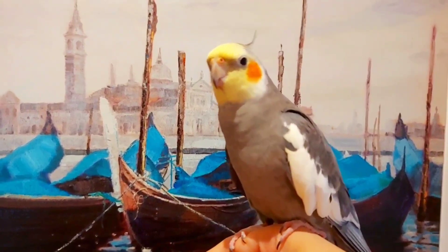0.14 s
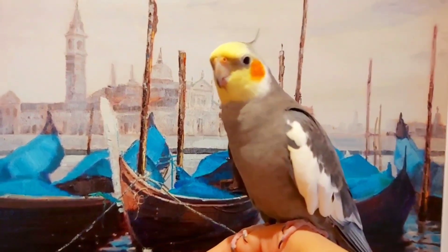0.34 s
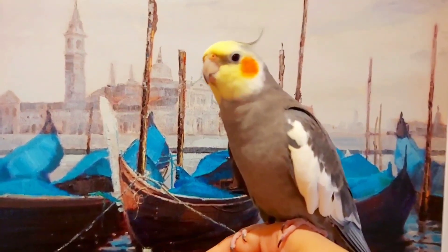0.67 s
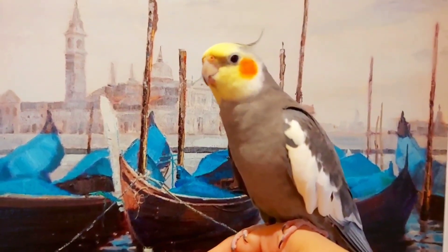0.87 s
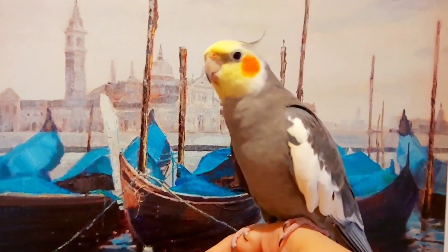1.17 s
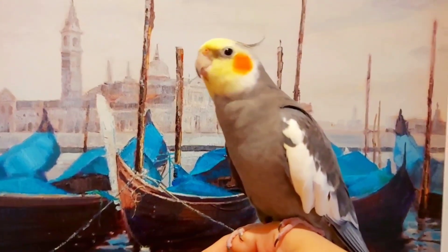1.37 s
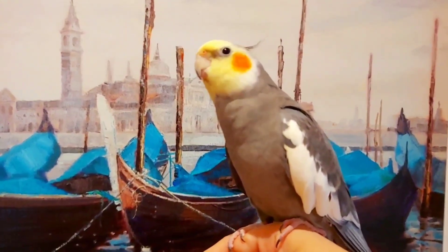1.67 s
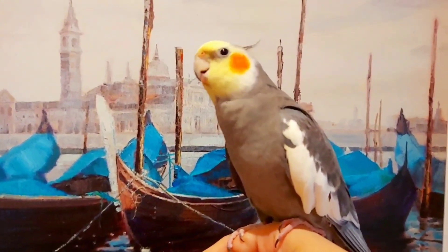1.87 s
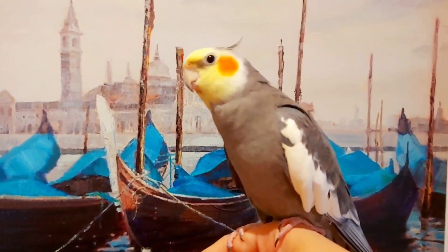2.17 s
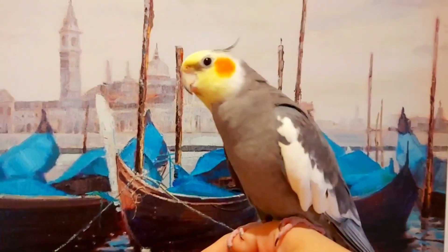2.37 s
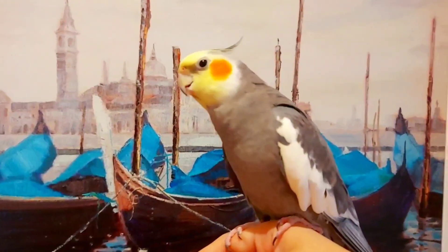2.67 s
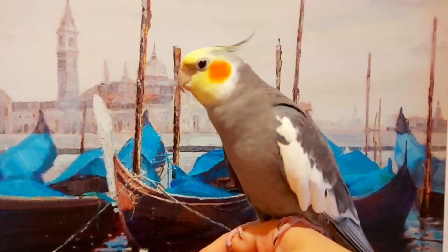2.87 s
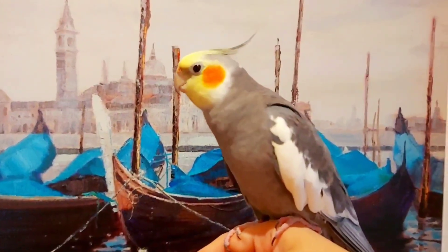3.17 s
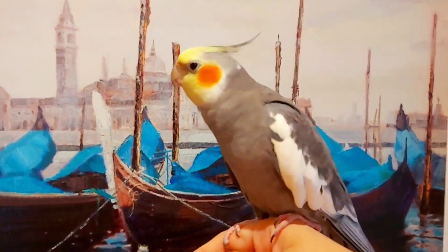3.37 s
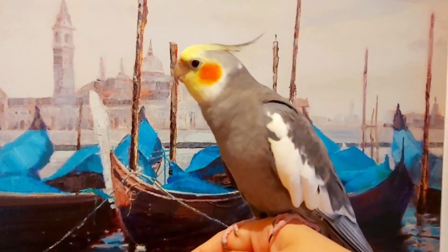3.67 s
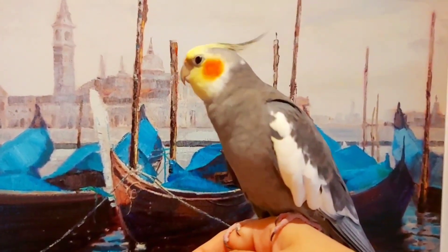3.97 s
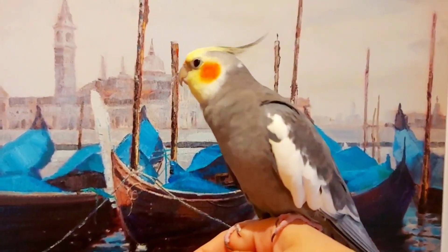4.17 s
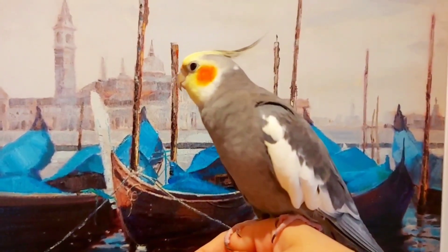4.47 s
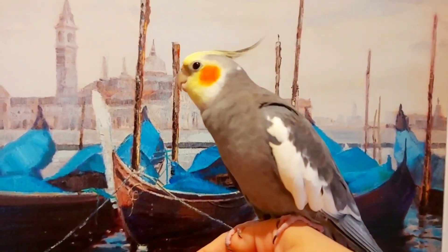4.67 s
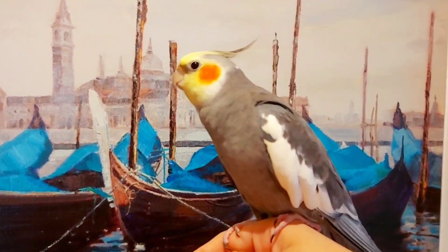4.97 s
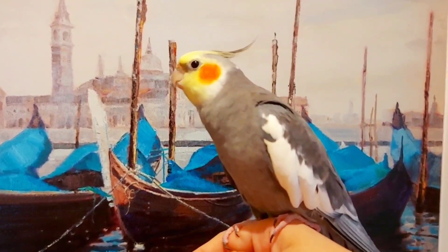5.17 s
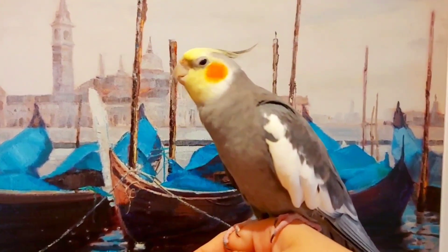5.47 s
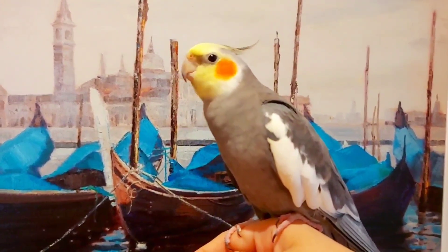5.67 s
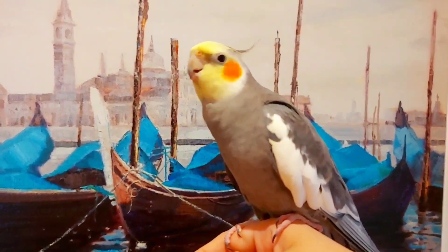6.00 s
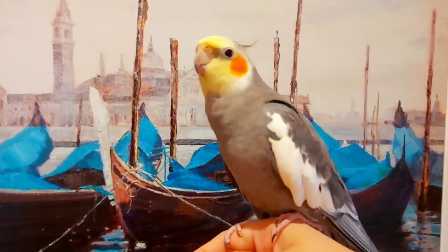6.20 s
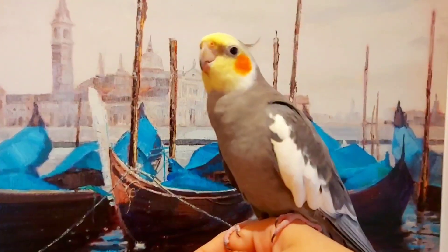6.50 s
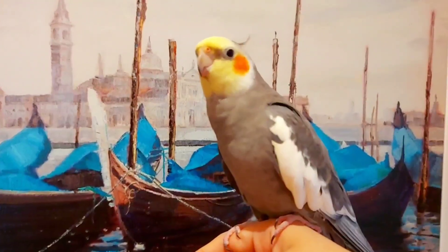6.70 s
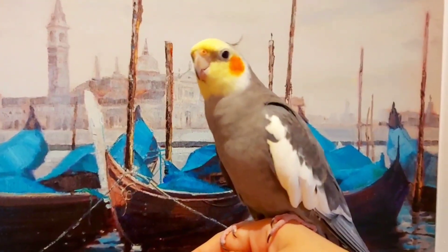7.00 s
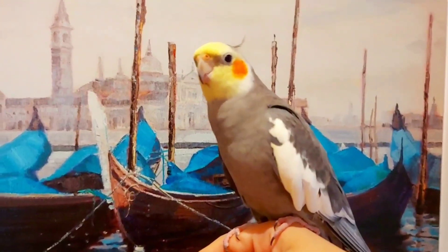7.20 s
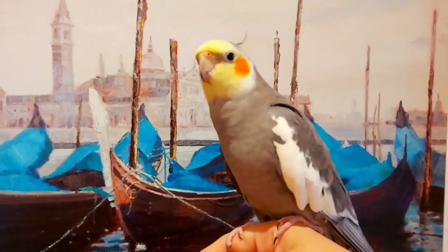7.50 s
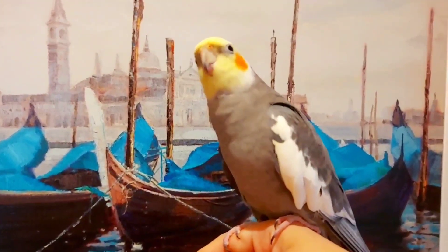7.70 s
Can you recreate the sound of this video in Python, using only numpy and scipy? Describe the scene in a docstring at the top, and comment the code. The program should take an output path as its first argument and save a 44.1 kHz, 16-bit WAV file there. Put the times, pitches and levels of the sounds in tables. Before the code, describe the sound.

A bare, lively room is still faintly ringing from an earlier whistle, over quiet uneven rumble and thin hiss. At about 0.5 s a close cockatiel, towards the left, whistles a note swooping up to a wavering hold; at 0.9 s comes a higher one, broken by raspy cracks and falling, and at 1.3 s one climbing in steps from a soft low start. From 1.7 s it switches to fourteen similar chirps, about every 0.4 s, up to 6.85 s, then after a longer pause a last one at 7.5-7.7 s. Each lasts about 0.2 s: a soft low whistle dips, bends up, leaps to a piercing upper voice, climbs and stops abruptly with a tiny crack. Peaks slightly overload the left side, and short bright reverberation fills the gaps. Rumble grows after 6 s; rumble and hiss swell around the final chirp until 7.85 s.

```python
"""A bare, lively room: a cockatiel perched on a hand whistles three warbled notes, then a row of rising chirps.
The voice is a near sine with overtones, roughened by cracks and glides, close to the left of two microphone ports;
its loudest notes overload the left side. A noise tail dying band by band is the room, still ringing with an
earlier note at the start. Shaped noise makes the low rumble, rising and falling unevenly and loudest at the end,
and the faint hiss."""
import sys
import numpy as np
from scipy import signal
from scipy.fft import rfft, irfft, next_fast_len
from scipy.io import wavfile
from scipy.ndimage import uniform_filter1d

SR = 44100
rng = np.random.default_rng(int(sys.argv[2]) if len(sys.argv) > 2 else 0)


def wrap_up_sound(samples):
    """Save the sound to the file named by the first command line argument, as 16-bit audio."""
    columns = np.atleast_2d(samples).T
    # keep every value between -1 and 1, then stretch to whole-number steps
    tamed = np.clip(columns, -1, 1)
    steps = np.round(tamed * 32767).astype(np.int16)
    wavfile.write(sys.argv[1], SR, steps)


N = 346185

# lift by windpipe, beak and microphone: f/Hz, gain/dB
TRACT_GAIN = [(2000, 45.5), (2800, 15.5), (3600, 7), (4500, 9), (6500, -6), (9000, -11), (11500, 11.5),
              (13000, 14.5), (15500, 4.5)]
# room bands: f/Hz, t60/s, tail level/dB
ROOM_BANDS = [(795, 0.35, -8.5), (1670, 0.56, -11.5), (2800, 0.53, -12.5), (5070, 0.44, -14),
              (12000, 0.34, -7.5)]


def from_db(db):
    """Decibels to gain."""
    return 10 ** (np.asarray(db) / 20)


def rms_one(x):
    """Scale to rms 1."""
    return x / np.sqrt(np.mean(x ** 2) + 1e-20)


def at_hz(points, hz, axis=1):
    """Read a table column on a log-frequency axis."""
    table = np.array(points)
    return np.interp(np.log(np.maximum(hz, 1)), np.log(table[:, 0]), table[:, axis])


def drift(rate_hz):
    """Slow chance: noise twice through a one-pole low-pass, rms 1."""
    r = np.exp(-2 * np.pi * rate_hz / SR)
    noise = rng.standard_normal(N + SR)
    return rms_one(signal.lfilter([1], [1, -2 * r, r * r], noise)[SR:])  # settled part


def coloured_noise(spectrum):
    """Stereo noise of a given spectrum, its sides correlated in the bass, rms 1."""
    # left-right correlation: f/Hz, correlation/1
    likeness = [(60, 1), (300, 0.7), (700, 0.75), (1500, 0.037), (15000, 0)]
    hz = np.arange(N // 2 + 1) * SR / N
    mid, side = rfft(rng.standard_normal((2, N))) * from_db(at_hz(spectrum, hz))
    alike = np.clip(at_hz(likeness, hz), -1, 1)
    stereo = np.sqrt(1 + alike) * mid + np.sqrt(1 - alike) * side * [[1], [-1]]
    return rms_one(irfft(stereo, N))


def earlier_ring():
    """Room ring of a note that has just ended: narrow noise bands dying at the room's t60."""
    # f/Hz, width/Hz, starting level/dB
    ring_bands = [(1518, 78, -55.5), (2060, 170, -73.5), (3020, 250, -65)]
    t = np.arange(N) / SR
    out = 0
    for hz, width_hz, db in ring_bands:
        r = np.exp(-np.pi * width_hz / SR)
        resonator = [1, -2 * r * np.cos(2 * np.pi * hz / SR), r * r]
        ring = signal.lfilter([1, 0, -1], resonator, rng.standard_normal((2, N)))
        out = out + from_db(db - 60 * t / at_hz(ROOM_BANDS, hz)) * rms_one(ring)
    return out


def rumble():
    """One coloured noise split near 140 Hz; hum and upper rumble rise and fall apart."""
    # levels ahead of the port gain: t/s, low hum/dB, upper rumble/dB
    levels = [(0.0, -75, -63.5), (1.2, -66.5, -69.5), (2.3, -74, -67.5), (2.9, -76.5, -73), (3.4, -81, -66),
              (4.6, -71.5, -68.5), (5.1, -63.5, -68.5), (5.6, -67.5, -69), (6.2, -68, -58),
              (7.37, -65.5, -59.5), (7.85, -61, -48)]
    # relative spectrum: f/Hz, density/dB per Hz
    colour = [(12, -48.5), (20, -22.5), (75, 7), (173, -12), (248, -8), (549, -25.5), (677, -28),
              (835, -26.5), (1010, -32.5), (2820, -39), (3000, -51.5), (3900, -85.5), (6600, -120)]
    t_s, hum_db, upper_db = np.transpose(levels)
    t = np.arange(N) / SR
    noise = coloured_noise(colour)
    hum = signal.sosfiltfilt(signal.butter(2, 140, fs=SR, output="sos"), noise)
    hum_gain = from_db(np.interp(t, t_s, hum_db) + .8 * drift(6))
    upper_gain = from_db(np.interp(t, t_s, upper_db) + 1.3 * drift(6))
    return hum_gain * rms_one(hum) + upper_gain * rms_one(noise - hum)


def faint_hiss():
    """Coloured noise of slowly wavering level, setting in louder near the end."""
    # level ahead of the port gain: t/s, level/dB
    levels = [(0, -72), (7.44, -75), (7.5, -57), (7.85, -51)]
    # relative spectrum: f/Hz, density/dB per Hz
    colour = [(300, -15), (600, 0), (1500, 2), (3000, -7.5), (5000, -7.5), (8000, -7), (12000, -3),
              (15500, -9)]
    level_db = np.interp(np.arange(N) / SR, *np.transpose(levels)) + 1.5 * drift(12)
    return from_db(level_db) * coloured_noise(colour)


def overtones(phase, pitch, level_db, bright_db, strain):
    """Harmonics lifted by tract and effort; the higher, the more flicker and noise in amplitude and phase."""
    # source: multiple/1, amplitude ahead of tract and effort/dB
    source = [(2, -29.5), (3, -28.5), (4, -37), (5, -37.5), (6, -46), (7, -54)]
    EFFORT_SHARE = .08  # overtone dB per dB of level
    FLICKER_DB = .75  # per multiple at strain 1
    out = 0
    for k, source_db in source:
        tract_db = at_hz(TRACT_GAIN, k * pitch)
        flicker_db = FLICKER_DB * strain * k * drift(52)
        lift = from_db(source_db + bright_db + tract_db + EFFORT_SHARE * level_db + flicker_db)
        grain = 1 + .17 * strain * k * drift(160)
        tone = np.sin(k * phase + .15 * strain * k * drift(150))
        out = out + lift * (k * pitch < SR / 2.3) * grain * tone
    return out


def membrane_shake(t, glide, cracks, cracking):
    """Cracks and fast glides shake the membranes: modulation that puts side tones round every line."""
    RASP_DB, GLIDE_RASP = -57.5, .00044  # steady rasp; extra gain per octave/s
    FLUTTER_HZ = 750
    low_pass = signal.butter(4, 1100, fs=SR, output="sos")
    noise = rms_one(signal.sosfilt(low_pass, rng.standard_normal(N)))
    flutter = np.sin(2 * np.pi * FLUTTER_HZ * t) + .9 * noise
    crack_gain = np.dot(from_db([row[2] for row in cracks]), cracking)
    return (from_db(RASP_DB) + GLIDE_RASP * glide) * noise + crack_gain * flutter


def breath_noise():
    """Air noise above 5.5 kHz through the tract, rms 1."""
    hz = np.arange(N // 2 + 1) * SR / N
    white = rfft(rng.standard_normal(N))
    return rms_one(irfft(white * from_db(at_hz(TRACT_GAIN, hz)) * (hz > 5500), N))


def bird():
    """Syrinx: a near sine along pitch and level contours, with overtones, membrane shake and breath."""
    # three warbled notes, a curve each: t/s, pitch/Hz, level/dB
    warbles = [
        [(0.469, 1190, -44.5), (0.474, 1193, -36.5), (0.498, 1133, -33.5), (0.534, 1317, -22),
         (0.545, 1640, -25), (0.554, 1923, -13.5), (0.584, 2010, -6.5), (0.618, 2115, -10.5),
         (0.662, 1998, -14), (0.698, 2116, -9), (0.742, 2032, -9), (0.751, 2030, -44)],
        [(0.927, 2094, -26), (0.932, 2055, -26), (0.946, 2292, -14), (0.957, 2475, -2.5), (0.972, 2500, 0.2),
         (0.99, 2360, -6), (1.018, 2390, -8.5), (1.032, 2313, -24), (1.056, 2353, -21.5), (1.068, 2204, -20.5),
         (1.084, 2210, -8.5), (1.114, 2050, -7), (1.13, 2065, -12.5), (1.14, 2067, -25.5)],
        [(1.279, 1260, -34), (1.304, 1189, -25.5), (1.364, 1227, -26), (1.396, 1464, -22), (1.404, 1844, -14.5),
         (1.436, 2204, -9.5), (1.462, 2262, -10.5), (1.488, 2280, -11.5), (1.506, 2460, -10),
         (1.516, 2475, -11.5), (1.525, 2510, -41)],
    ]
    # chirps: start/s, leap/s, crest/s, end/s, dip/Hz, bend/Hz, mid-climb/Hz, top/Hz, low/dB, landing/dB,
    # mid-climb/dB, top/dB, closing/dB, crack flutter gain/dB, overtone and breath offset/dB
    chirp_rows = [ (1.711, 1.798, 1.861, 1.899, 1218, 1294, 2230, 2846, -26.5, -10, -12.5, -0.9, -3, -41.5, -3.5),
                  (2.083, 2.171, 2.248, 2.274, 1175, 1244, 2335, 2800, -28.5, -10.5, -10.5, -3.5, -4.5, -34, -2.5),
                  (2.476, 2.565, 2.65, 2.68, 1190, 1268, 2185, 2740, -27, -12, -13.5, -5.5, -5.5, -32.5, -2),
                  (2.874, 2.974, 3.046, 3.08, 1179, 1275, 2120, 2745, -28, -16, -11, -4.5, -15.5, -17, -1.6),
                  (3.291, 3.393, 3.458, 3.516, 1207, 1256, 2200, 2778, -27, -16.5, -11, -7, -16, -35.5, -1.2),
                  (3.678, 3.795, 3.862, 3.886, 1192, 1308, 2243, 2793, -26.5, -15.5, -10.5, -5, -5, -40, -0.9),
                  (4.091, 4.195, 4.268, 4.336, 1128, 1267, 2300, 2800, -27.5, -14, -9, -4.5, -19.5, -32, -1.2),
                  (4.507, 4.618, 4.72, 4.736, 1179, 1245, 2252, 2801, -27.5, -14, -11, -3.5, -8.5, -55, -1.3),
                  (4.933, 5.04, 5.115, 5.153, 1153, 1257, 2201, 2803, -28, -15.5, -10, -4.5, -5.5, -41, 0.2),
                  (5.353, 5.462, 5.536, 5.571, 1156, 1230, 2212, 2788, -29, -17, -15, -5, -7.5, -43.5, 0.9),
                  (5.842, 5.937, 6.012, 6.045, 1155, 1303, 2343, 2910, -27, -13.5, -9.5, -1.4, -1.5, -42, -2.5),
                  (6.23, 6.324, 6.386, 6.407, 1200, 1274, 2190, 2790, -26.5, -9.5, -12.5, -1.2, -9.5, -21.5, -2),
                  (6.65, 6.751, 6.824, 6.848, 1169, 1245, 2333, 2838, -29.5, -16, -10.5, -1.5, -6, -17, -1.5),
                  (7.473, 7.56, 7.654, 7.690, 1163, 1197, 2342, 2850, -31.5, -16.5, -11.5, -0.1, -9.5, -39, -1),
                  ]
    # cracks in the warbles: t/s, length/s, flutter gain/dB, pitch sag/share
    warble_cracks = [(.628, .008, -26, .04), (.648, .010, -18, .07), (.664, .010, -19, .08),
                     (.747, .010, -22, .06), (.936, .014, -12, .02), (1.020, .014, -14, 0),
                     (1.038, .020, -5, 0), (1.057, .014, -8, .23), (1.128, .010, -24, 0)]
    CLOSING_CRACK_S = .022
    PITCH_WAVER, GLIDE_PITCH_WAVER = .003, .0013  # share; extra share per octave/s
    LEVEL_WAVER_DB, GLIDE_LEVEL_WAVER_DB = .6, .13  # held note; extra per octave/s
    BREATH_DB, HALF_TONE_DB = -47, -61.5
    t = np.arange(N) / SR
    notes = warbles + [chirp(*row[:13]) for row in chirp_rows]
    cracks = warble_cracks + [(row[3] - CLOSING_CRACK_S / 2, CLOSING_CRACK_S, row[13], 0) for row in chirp_rows]

    t_s, hz, db = np.concatenate([np.array(note) for note in notes]).T
    contour = np.interp(t, t_s, hz)
    within = [(t >= note[0][0]) & (t <= note[-1][0]) for note in notes]
    sounding = uniform_filter1d(uniform_filter1d(1. * sum(within), size=60), size=60)
    bright_db = np.dot([row[14] for row in chirp_rows], within[len(warbles):])
    cracking = np.array([np.exp(-2 * ((t - row[0]) / (row[1] / 2)) ** 2) for row in cracks])
    sag = np.dot([row[3] for row in cracks], cracking)

    glide = uniform_filter1d(np.abs(np.gradient(np.log2(contour))) * SR, size=200)  # octaves/s
    capped_glide = np.minimum(glide, 8)
    waver = PITCH_WAVER + GLIDE_PITCH_WAVER * capped_glide  # sweeps climb unevenly
    pitch = contour * (1 - sag + waver * drift(49) + .0015 * drift(200))
    level_waver_db = (LEVEL_WAVER_DB + GLIDE_LEVEL_WAVER_DB * capped_glide) * drift(70)
    level_db = uniform_filter1d(np.interp(t, t_s, db), size=60) + level_waver_db
    strain = .2 + .14 * np.minimum(uniform_filter1d(glide, size=900), 8)  # held notes are cleaner

    phase = 2 * np.pi * np.cumsum(pitch) / SR
    tone = np.sqrt(2) * np.sin(phase) + overtones(phase, pitch, level_db, bright_db, strain)
    shaken = tone * (1 + membrane_shake(t, glide, cracks, cracking))
    breath = from_db(BREATH_DB + bright_db) * breath_noise()
    voice = from_db(level_db) * (shaken + breath)
    # unsteady tone an octave down, independent of the note's level
    half_gain = from_db(HALF_TONE_DB + 5.7 * drift(30)) * (1 + .5 * drift(120))
    voice += half_gain * np.sin(phase / 2)
    return signal.sosfilt(signal.butter(4, 500, "high", fs=SR, output="sos"), sounding * voice)


def chirp(start, leap, crest, end, dip_hz, bend_hz, mid_hz, top_hz, low_db, landing_db, mid_db, top_db, closing_db):
    """Turning points (t/s, f/Hz, level/dB): soft low dip, bend up, leap to the upper voice, climb, release."""
    START_HZ, BEND_TOP_HZ, LEAP_HZ, LANDING_HZ = 1225.2, 1455, 1773, 1855
    landing, closing = leap + .007, end - .0076
    dip = start + .42 * (leap - start)
    closing_hz = top_hz * .99
    return [
        (start, START_HZ, low_db - 7),
        (start + .005, START_HZ, low_db),
        (dip, dip_hz, low_db),
        (leap - .022, bend_hz, low_db + 2.5),
        (leap - .0067, BEND_TOP_HZ, low_db + 8.5),
        (leap, LEAP_HZ, -22.5),
        (landing, LANDING_HZ, landing_db),
        ((landing + crest) / 2, mid_hz, mid_db),
        (crest, top_hz * .98, top_db + .5),
        ((crest + closing) / 2, top_hz, top_db),
        (closing, closing_hz, closing_db),
        (end, closing_hz, closing_db - 28),
    ]


def heard_in_room(voice):
    """Direct sound at both ports plus a noise tail dying band by band, its own on each side."""
    # right port re left for the near bird: f/Hz, gain/dB, lag/rad
    right_port = [(585, -6.5, 0.26), (1620, -5.5, 1.82), (2450, -11, 2.02), (4900, -11.5, 3.0),
                  (8450, -1.5, 1.7), (11800, -6.5, 4.77), (15000, -3.5, 1.7)]
    ROOM_RIGHT_DB, ROOM_ONSET_S = -3, .0024
    size = next_fast_len(N + SR)
    hz = np.arange(size // 2 + 1) * SR / size
    t = np.arange(SR) / SR
    right = from_db(at_hz(right_port, hz)) * np.exp(-1j * at_hz(right_port, hz, axis=2))
    white = rfft(rng.standard_normal((2, SR)))
    log_bands = np.log([row[0] for row in ROOM_BANDS])
    log_hz = np.log(np.arange(1, SR // 2 + 2))
    tail = 0
    for k, (_, t60_s, room_db) in enumerate(ROOM_BANDS):
        share = np.interp(log_hz, log_bands, np.arange(len(ROOM_BANDS)) == k)  # crossfaded band
        decay = from_db(-60 * t / t60_s) * (1 - np.exp(-t / ROOM_ONSET_S))  # echoes thicken at first
        band = irfft(white * share, SR)
        tail = tail + from_db(room_db) * band * decay / np.sqrt(np.sum(decay ** 2))
    tail = rfft(tail * from_db([[0], [ROOM_RIGHT_DB]]), size)
    direct = [np.ones_like(right), right]
    return irfft(rfft(voice, size) * (tail + direct), size)[:, :N]


def scene():
    """Bird and earlier ring in the room over rumble and hiss."""
    port_gain = from_db([[.8], [-.8]])  # dB, left and right
    background = (rumble() + faint_hiss()) * port_gain
    return earlier_ring() + heard_in_room(bird()) + background


def record(dry):
    """Overload: a sharp knee flattens peaks, a slight square-law bend thumps in the bass; the top is cut."""
    OVERLOAD, KNEE = .95, 14.0  # ceiling amplitude, sharpness
    LOPSIDED = .0023
    CUTOFF_HZ = 15560
    flat = dry / (1 + np.abs(dry / OVERLOAD) ** KNEE) ** (1 / KNEE)
    flat = flat - LOPSIDED * flat ** 2
    return signal.sosfilt(signal.ellip(14, .5, 90, CUTOFF_HZ, fs=SR, output="sos"), flat)


dry = scene()
out = record(dry)
wrap_up_sound(out)
```